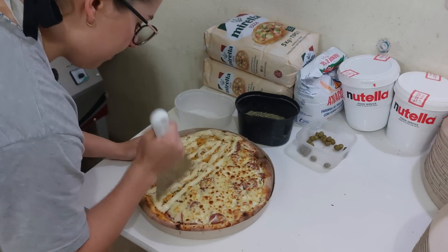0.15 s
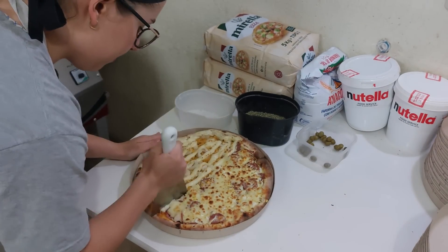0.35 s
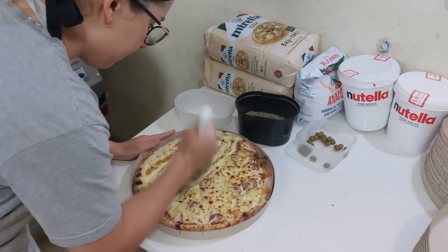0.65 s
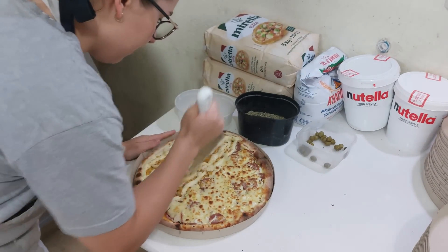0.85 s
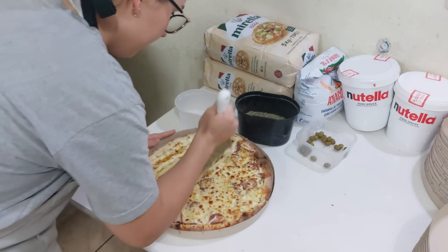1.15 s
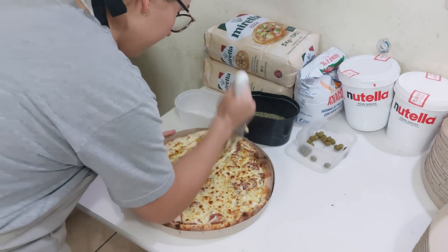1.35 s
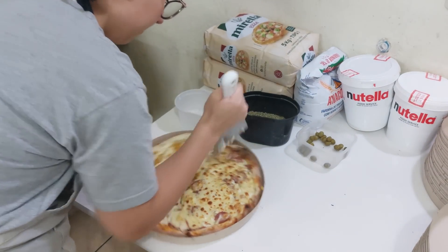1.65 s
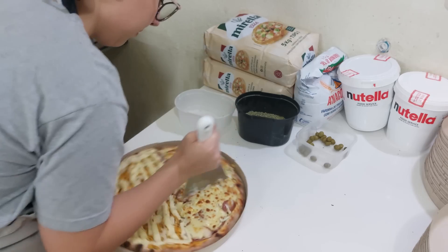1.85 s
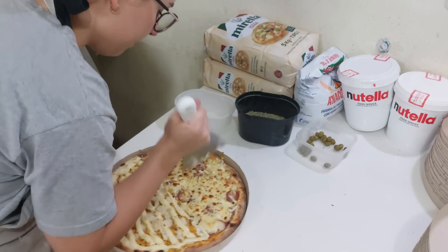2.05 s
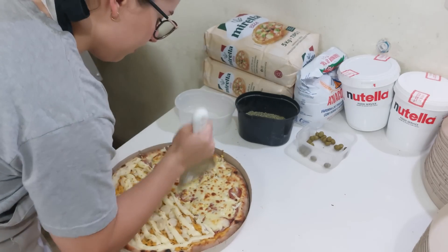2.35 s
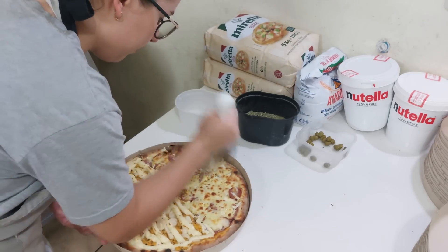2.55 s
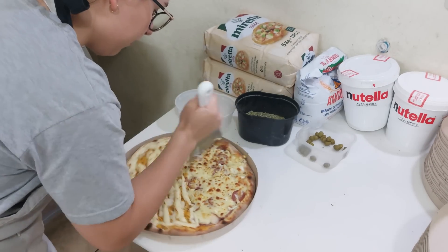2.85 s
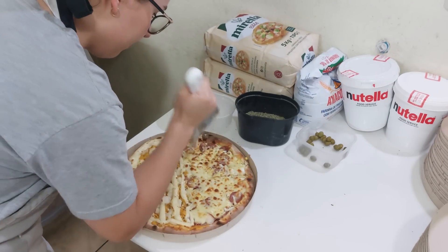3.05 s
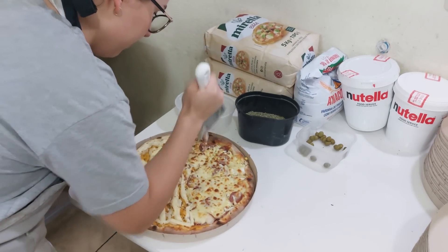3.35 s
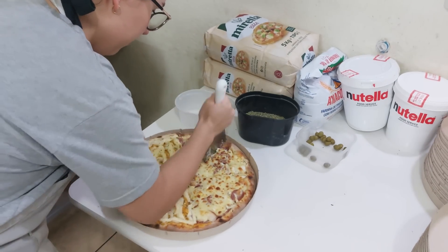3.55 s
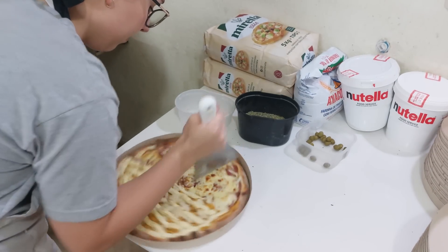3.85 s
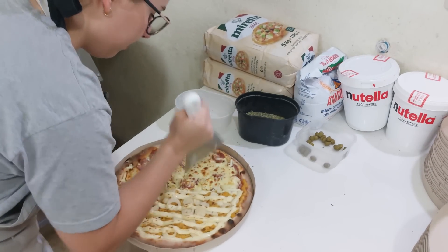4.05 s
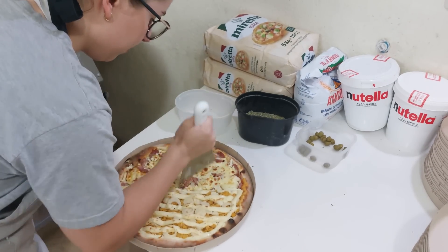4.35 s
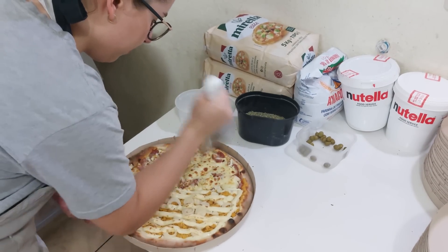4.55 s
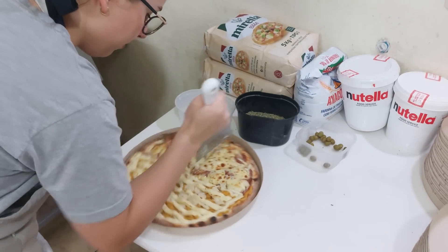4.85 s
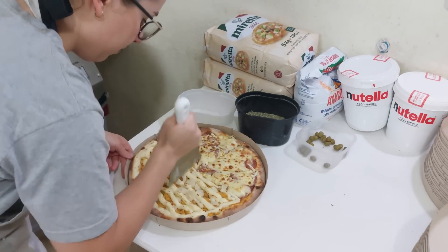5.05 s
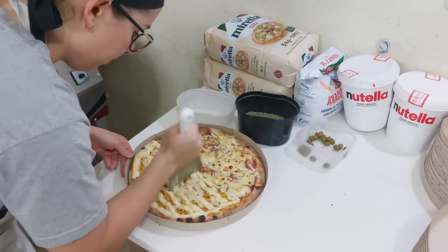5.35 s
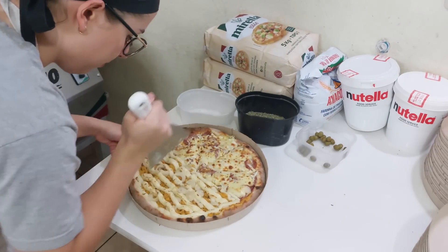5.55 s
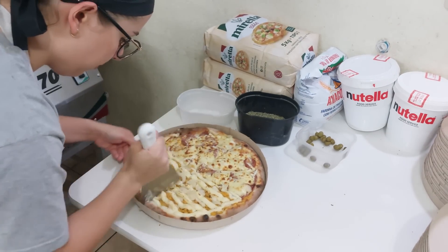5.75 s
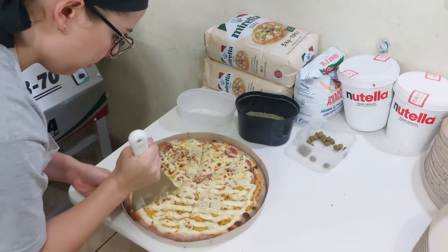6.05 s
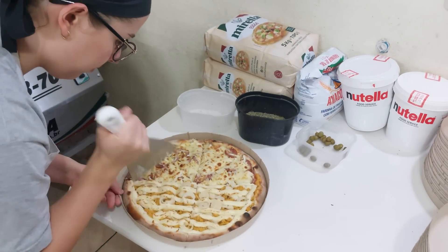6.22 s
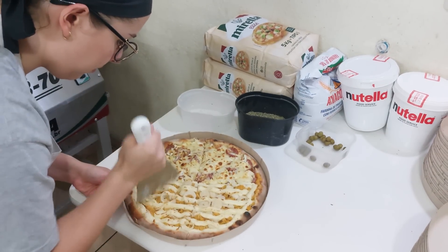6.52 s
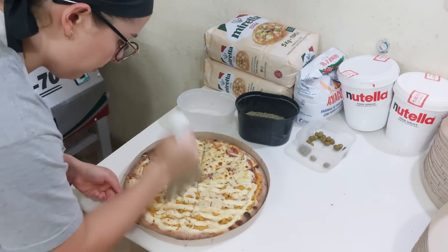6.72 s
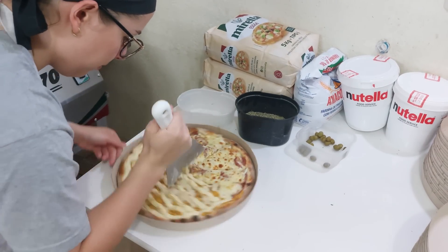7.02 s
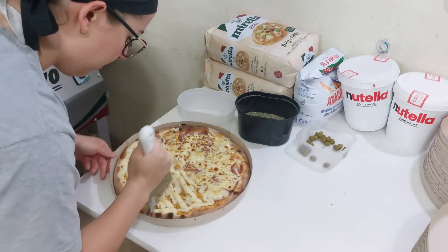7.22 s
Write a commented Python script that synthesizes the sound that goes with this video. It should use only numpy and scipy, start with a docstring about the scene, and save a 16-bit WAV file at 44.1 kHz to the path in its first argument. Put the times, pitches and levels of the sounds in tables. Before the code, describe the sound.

In a small hard kitchen, a flat steel cutter chops crunchily through crisp pizza crust fourteen times, thumping the counter between gritty drags of the base.

```python
"""A small hard kitchen, close stereo microphone: low room rumble, a faint hum and two thin whines throughout.
The take opens on the ring of an earlier chop, a short drag of the round base, two raps and some crust cracks.
Then a flat steel cutter chops fourteen times: uneven snaps crunch the crust, and the thump rings a bank of
standing waves, with a knock and a counter heave beside it. Between chops the base drags round as gritty noise.
It ends on one more drag and a few cracks of the crust."""
import sys
import numpy as np
from scipy import signal
from scipy.fft import rfft, irfft
from scipy.io import wavfile
from scipy.ndimage import uniform_filter1d

SR = 44100
rng = np.random.default_rng(int(sys.argv[2]) if len(sys.argv) > 2 else 0)


def persist_wave(psi):
    """Save psi, clipped to +-1, as 16-bit WAV."""
    counts = np.round(np.clip(psi, -1, 1) * 32767).astype(np.int16)
    wavfile.write(sys.argv[1], SR, np.atleast_2d(counts).T)


N = 325678

# chops of the blade down to the base: (time [s], force [dB], hardness [dB per octave about 350 Hz],
# boom below 95 Hz [dB re force], counter heave [dB re force], knock drive [dB],
# first touch of the crust [dB], last snap of the crust [dB])
CHOPS = [(-.3, -28.5, -8, 17, 24, -12.5, -40, -25), (0.3626, -12, -2.5, -3, -2.5, -10.5, -41, -24.5),
         (0.7411, -13, -2.5, 0.5, 1, -29, -49.5, -23), (1.114, -11.5, -2, -2, -0.5, -18, -44, -25),
         (1.458, -21, -15, 6.5, 7.5, -36, -34.5, -42.5), (2.3042, -13.5, 1, -2, -7, -5, -42.5, -27),
         (2.6531, -17, 3.5, 2.5, 2.5, -7, -27.5, -39.5), (3.202, -13.5, 3, -2, -3.5, -12.5, -44, -28.5),
         (3.5605, -16.5, 2, 0.5, 0.5, -18, -36, -33), (4.317, -13, 5, -2.5, -1.5, -6.5, -42.5, -29),
         (4.6751, -15.5, -8, 1.5, 7, -13.5, -32, -26.5), (5.3625, -15.5, -3, 3.5, -4, -20, -52, -27.5),
         (5.7202, -17.5, -5, 3, 4, -16.5, -25, -25), (6.4255, -16.5, -3, 0, 3, -17, -37, -40.5),
         (6.8087, -14, -2, 2, -2, -7, -44, -28)]


def gain_of(db):
    """Amplitude factor for a level in dB."""
    return 10 ** (np.asarray(db) / 20)


def evened(x):
    """Scale a signal to an rms of one."""
    return x / np.sqrt(np.mean(x ** 2) + 1e-20)


def read(points, hz):
    """Read a (frequency, value) curve at hz, straight between points on a log frequency axis."""
    f, value = np.transpose(points)
    return np.interp(np.log(hz + 1), np.log(f + 1), value)


def add(mix, s, sound):
    """Lay a sound into the mix from s seconds on, trimming what falls outside."""
    at = round(s * SR)
    sound = sound[..., max(-at, 0):]
    part = mix[..., max(at, 0):][..., :sound.shape[-1]]
    part += sound[..., :part.shape[-1]]


def noise(length, db_at, size=512):
    """Stereo noise built from random spectra, its level in dB given by frequency and time."""
    # how alike left and right sound: (frequency [Hz], correlation [-1 to 1])
    likeness = [(60, 0.96), (180, 0.89), (550, 0.41), (1650, -0.24), (4970, -0.061), (15000, -0.37)]
    hz = np.fft.rfftfreq(size, 1 / SR)[:, None]
    t = np.arange(4 * length // size + 5) * size / 4 / SR
    a, b, c, d = rng.standard_normal((len(t), len(hz), 4)).T
    same = np.clip(read(likeness, hz), -1, 1)
    left = a + 1j * b
    right = same * left + np.sqrt(1 - same ** 2) * (c + 1j * d)
    spectra = np.array([left, right]) * gain_of(db_at(hz, t))
    return signal.istft(spectra, nperseg=size, noverlap=3 * size // 4)[1][:, :length]


def swing(t, hz, seconds):
    """A swing or two of a cosine under a bell."""
    return np.cos(2 * np.pi * hz * t) * np.exp(-(t / seconds) ** 2)


def kitchen(x):
    """Dense echoes of the room that build up over 7 ms and die band by band."""
    # diffuse tail: (frequency [Hz], time to fall 60 dB [s])
    decay = [(100, 0.69), (260, 0.94), (700, 0.48), (1840, 0.64), (4850, 0.56), (12800, 0.37)]
    tail = noise(SR, lambda hz, t: -60 * t / read(decay, hz), size=256)
    tail = tail * np.clip(np.arange(SR) / SR / .007, 0, 1)
    return signal.fftconvolve(x[None], tail / np.linalg.norm(tail[0]), axes=1)[:, :len(x)]


def floor():
    """Low room rumble as shaped noise, with faint steady tones alike on both sides."""
    # colour of the quiet room: (frequency [Hz], relative level [dB per Hz])
    room = [(18, -28.5), (30, -5.5), (104, 5.5), (409, -12), (1890, -29.5), (2600, -27), (3050, -40),
            (5160, -37), (9230, -36.5), (13700, -32), (16500, -54.5)]
    # a hum and a pair of thin whines: (frequency [Hz], peak level [dB])
    hum = [(59.2, -88.5), (2564, -78), (2623, -74)]
    t = np.arange(N) / SR
    tones = sum(gain_of(db) * np.sin(2 * np.pi * hz * t) for hz, db in hum)
    rumble = evened(noise(N, lambda hz, t: read(room, hz), size=2048))
    return gain_of(-53.5) * rumble + tones


def sliding():
    """Soft gritty friction hiss that swells and fades as the base is turned on the counter."""
    # drags of the base: (time when fastest [s], level there [dB], rise [s], fall [s])
    turns = [(.045, -53, .06, .02), (1.8, -47.5, .16, .42), (2.9, -58, .15, .15), (3.95, -49, .12, .2),
             (4.93, -52, .15, .2), (6.03, -50, .15, .12), (7.11, -49, .13, .15)]
    # colour of the friction: (frequency [Hz], relative level [dB per Hz])
    friction = [(120, -35), (200, 4), (522, -3), (860, -4.5), (1580, -2.5), (1870, -3.5), (13200, -14.5),
                (15600, -9), (16500, -58)]
    fade_db, grit_db = 7, 0.55  # level lost over one rise or fall time; rms flutter of the level
    t, level = np.arange(N) / SR, np.zeros(N)
    for s, db, rise, fall in turns:
        level += gain_of(db - fade_db * ((t - s) / np.where(t < s, rise, fall)) ** 2)
    grit = gain_of(grit_db * evened(uniform_filter1d(rng.standard_normal(N), size=600)))
    return level * evened(grit * noise(N, lambda hz, t: read(friction, hz)))


def heaves():
    """The counter top heaves under each blow: a burst of noise about 108 Hz that settles quickly."""
    heave_trim_db = -8  # rumble of the heave against its ring
    t60 = 0.52  # s
    sides = gain_of([[-1.1], [1.1]])  # a little stronger on the right
    out, t = np.zeros((2, N)), np.arange(0, .6, 1 / SR)
    for s, force_db, _, _, heave_db, *_ in CHOPS:
        shake = evened(noise(len(t), lambda hz, t: -16 * np.log2((hz + 1) / 108) ** 2, size=2048))
        fall = gain_of(force_db + heave_db + heave_trim_db - 60 * t / t60)
        onset = np.clip(t / 0.01, 0, 1)
        add(out, s, fall * onset * shake * sides)
    return out


def knocks():
    """The base answers blows and raps with a short knock, which the walls send back."""
    # the blade corner raps the rim of the base: (time [s], drive [dB], pitch [Hz])
    raps = [(.064, -21, 1093), (.072, -35.5, 722), (0.7405, -29, 1116), (1.4415, -28.5, 926),
            (2.6411, -11.5, 910), (3.5468, -18, 648), (4.6715, -19, 1363), (5.707, -39, 950),
            (6.413, -33, 1186)]
    # single far-wall echoes of a knock: (delay [s], level [dB re drive])
    slaps = [(.047, -5.5), (.059, -24), (.119, -32)]
    knock_hz = 553  # pitch of the knock under a chop
    out, t = np.zeros(N + SR), np.arange(-.01, .01, 1 / SR)
    from_chops = [(s, knock_db, knock_hz) for s, *_, knock_db, _, _ in CHOPS]
    for s, db, hz in from_chops + raps:
        add(out, 1 + s + t[0], gain_of(db) * swing(t, hz, 0.63 / hz))  # one second of lead-in
    far_wall = sum(gain_of(db) * np.roll(out, round(delay * SR)) for delay, db in slaps)
    heard = gain_of(-4.5) * out + far_wall + gain_of(8) * kitchen(out)
    return heard[:, SR:]


def breaks():
    """List every break of the crust: touch and snap of each chop, then the cracks of the crisp rim."""
    # crust sounds that lead every chop: (length [s], body below 2 kHz [dB], air above 9 kHz [dB])
    touch = (.0061, 0.4, 1)
    snap = (.0029, 9.6, -4)
    # the crisp rim cracks: (time [s], level [dB], length [s], air above 9 kHz [dB])
    cracks = [(.052, -39, 0.0028, -0.5), (0.0577, -12.5, .0004, 0.5), (0.0609, -28, .006, 3),
              (0.065, -24, .008, 2.5), (0.083, -32.5, .008, 0.5), (1.4404, -20, .0011, -1.5),
              (1.4438, -14, .0018, 3), (1.451, -32, .003, -11), (2.6396, -23.5, .0012, -6.5),
              (2.6437, -21, .0022, 0.5), (2.646, -31.5, 0.0027, -5), (3.5461, -26, .003, -10.5),
              (3.548, -21.5, .0034, 1.2), (4.6668, -14.5, 0.00054, 7), (4.669, -25, .0047, -2.5),
              (5.7042, -30, .005, -3.5), (5.711, -24, .002, 0), (6.106, -50, .005, -7),
              (6.12, -49, .004, -3), (6.1223, -29.5, .0044, 4.5), (6.14, -35.5, .006, 3),
              (6.4091, -30, .006, -1.5), (6.4189, -26.5, 0.0065, -1.5), (7.275, -61, .006, -10.5),
              (7.288, -42.5, .006, 2), (7.2973, -34, 0.0033, 0.5), (7.304, -33.5, .006, 0.5)]
    touch_lead, snap_lead = .0118, .0028  # s ahead of the blade reaching the base
    body_per_air = -1.4  # brighter cracks have less body
    rows = []
    for s, *_, touch_db, snap_db in CHOPS:
        rows.append((s - touch_lead, touch_db, *touch))
        rows.append((s - snap_lead, snap_db, *snap))
    return rows + [(s, db, length, body_per_air * air_db, air_db) for s, db, length, air_db in cracks]


def crunches():
    """Each break is a short run of uneven snaps in the colour of crust and blade, with its echoes."""
    # colour of breaking crust: (frequency [Hz], relative level [dB per Hz])
    crust = [(120, -41), (200, -4), (394, 1.5), (707, -6), (984, -6), (1140, -9.5), (1270, -9.5),
             (1470, -8.5), (2840, -12), (7790, -20.5), (9350, -21.5), (13200, -19), (15900, -20)]
    # resonances of the damped steel: (frequency [Hz], width [Hz], boost [dB])
    blade = [(4320, 720, 2), (6100, 54, -6), (7700, 1600, 4.5), (11600, 2700, 3.5), (13000, 2700, 3.5)]
    near, t = np.zeros(N), np.arange(2048) / SR - .005
    sent = np.zeros((3, N))
    hz = np.fft.rfftfreq(len(t), 1 / SR)
    blade_db = sum(db / (1 + (2 * (hz - f) / width) ** 2) for f, width, db in blade)
    for k, (s, level_db, length, body_db, air_db) in enumerate(breaks()):
        snaps = rng.standard_normal(len(t)) * gain_of(4 * np.minimum(rng.exponential(1, len(t)), 4))
        u = np.maximum(t, 0) / max(length, 2e-4)
        run = evened(snaps) * (1 - np.exp(-4 * u)) * np.exp(-u)
        # no two pieces alike: random lumps along the spectrum
        lumps = uniform_filter1d(rng.standard_normal(len(hz)), size=12)
        lumps = evened(uniform_filter1d(lumps, size=12))
        tilt_db = read([(1200, body_db), (3000, 0.003), (7000, 0), (11000, air_db)], hz)
        colour = gain_of(read(crust, hz) + blade_db + tilt_db + 2.2 * lumps)
        colour = gain_of(level_db) * colour / np.sqrt(np.mean(colour[hz > 3000] ** 2))
        add(near, s + t[0], irfft(rfft(run) * colour))
        # the walls smear the snaps together: they get one click of like energy, from one of three spots
        click = np.sqrt(0.21 * length * SR) * np.roll(irfft(colour), len(t) // 2)
        add(sent[k % 3], s + length - len(t) / 2 / SR, click)
    return near + gain_of(5) * sum(kitchen(x) for x in sent)


def thumps():
    """Every chop starts all standing waves together at their crest; a harder one favours the upper waves."""
    # standing waves of the room: (frequency [Hz], left pressure [relative], right pressure [relative],
    # time to fall 60 dB [s])
    waves = [(55.0, -0.26, -0.32, 0.3), (65.0, 0.16, 0.21, 1.0), (84.0, -0.15, -0.2, 0.65),
             (104.0, 0.23, 0.34, 0.3), (205.0, 0.17, 0.28, 0.45), (223.0, 0.25, 0.31, 0.45),
             (238.0, 0.22, 0.46, 0.3), (255.0, -0.2, -0.23, 0.8), (281.0, -0.37, -0.46, 0.45),
             (302.0, 0.11, 0.42, 0.65), (309.0, 0.54, 0.23, 0.3), (317.0, -0.46, -0.69, 0.45),
             (324.0, 0.49, 0.82, 0.3), (331.0, 0.16, 0.37, 0.45), (339.0, -0.2, -0.2, 0.65),
             (356.0, 0.47, 0.67, 0.65), (372.0, 0.2, 0.19, 0.65), (384.0, 0.37, 0.61, 0.3),
             (397.0, -0.37, -0.34, 0.45), (409.0, 0.24, 0.68, 0.3), (421.0, 0.25, 0.15, 0.65),
             (434.0, 0.6, 0.5, 0.3), (441.0, -0.12, -0.2, 0.65), (449.0, 0.02, 0.36, 0.45),
             (459.0, 0.19, 0.26, 0.65), (470.0, -0.4, -0.37, 0.45), (478.0, 0.27, 0.21, 0.45),
             (491.0, -0.26, -0.3, 0.3), (500.0, 0.29, 0.19, 0.45), (514.0, 0.32, 0.09, 0.45)]
    out, t = np.zeros((2, N)), np.arange(-.002, 1.2, 1 / SR)
    hz, left, right, t60 = np.transpose(waves)[:, :, None]
    onset = np.clip(1 + t / 0.0018, 0, 1)
    rings = np.cos(2 * np.pi * hz * t) * gain_of(-60 * t / t60) * onset
    for s, force_db, hard_db, boom_db, heave_db, *_ in CHOPS:
        tilt_db = np.select([hz < 95, hz < 150], [boom_db, heave_db], hard_db * np.log2(hz / 350))
        spot_db = rng.standard_normal(hz.shape)  # each spot of the base drives them differently
        drive = gain_of(force_db + tilt_db + spot_db)
        add(out, s + t[0], np.hstack([left * drive, right * drive]).T @ rings)
    return out


def scene():
    """Everything in the kitchen, from the quiet floor up to the chops."""
    return floor() + sliding() + heaves() + knocks() + crunches() + thumps()


def record(dry):
    """Microphone ports with bass cut and lean, a suppressor that lowers quiet sound, soft clip, band limit."""
    # lean of the two ports, applied above 550 Hz: (frequency [Hz], left minus right [dB])
    port_lean = [(600, -0.5), (1400, -0.5), (3100, 0.5), (6800, 2), (15000, -4)]
    edge_hz = 15950  # upper end of the band
    hz = np.fft.rfftfreq(N, 1 / SR)
    lean = gain_of(np.outer([.5, -.5], read(port_lean, hz) * (hz > 550)))
    bass_cut = np.sqrt(1 + (45 / (hz + 1)) ** 8)
    ports = irfft(rfft(dry) * lean / bass_cut, N)
    # below -34.5 dB each dB of quiet costs a further 0.46 dB
    power = uniform_filter1d((ports ** 2).mean(0), size=2000)
    power_db = 10 * np.log10(abs(power) + 1e-12)
    ports = ports / gain_of(0.46 * np.maximum(-34.5 - power_db, 0))
    # peaks beyond 0.7 bend over softly
    over = np.maximum(abs(ports) - .7, 0)
    ports = ports - np.sign(ports) * (over - .28 * np.tanh(over / .28))
    band = signal.firwin(511, edge_hz, window=("kaiser", 9), fs=SR)
    return signal.oaconvolve(ports, band[None], "same")


dry = scene()
out = record(dry)
persist_wave(out)
```